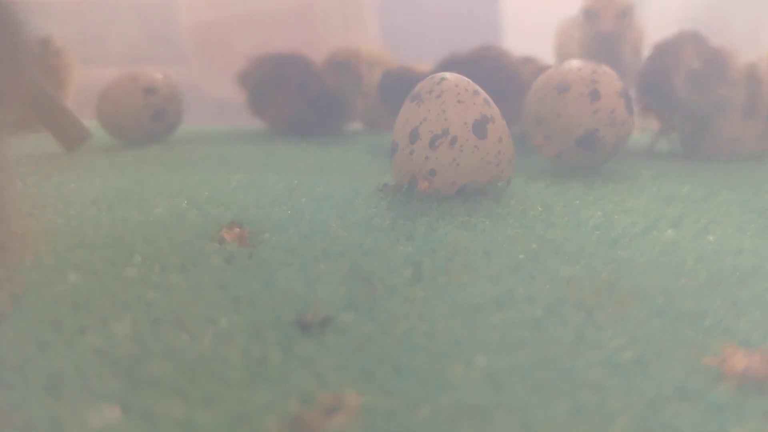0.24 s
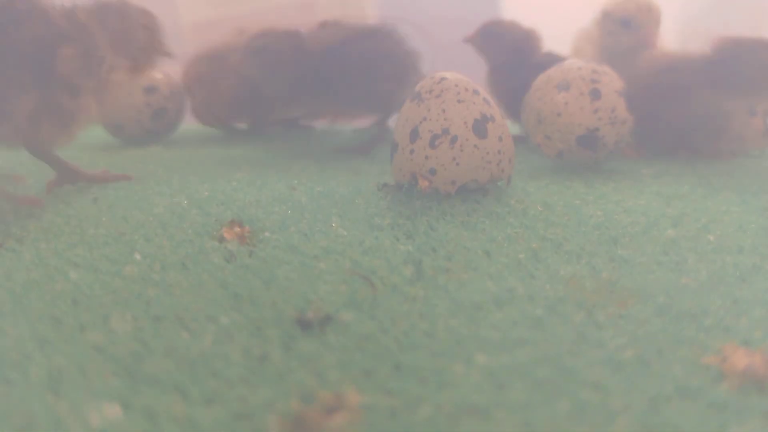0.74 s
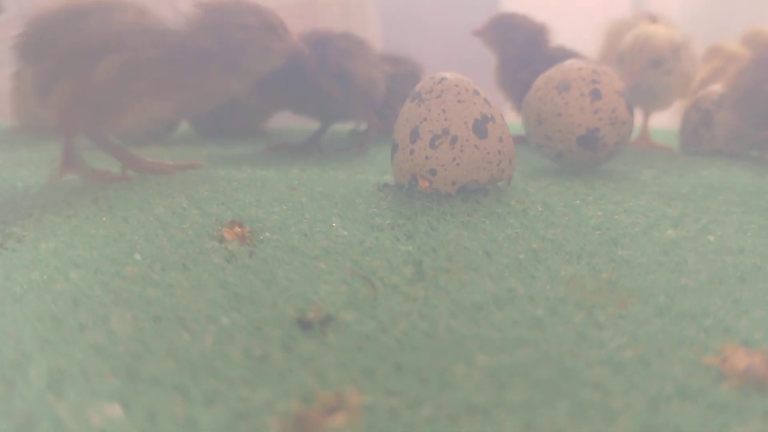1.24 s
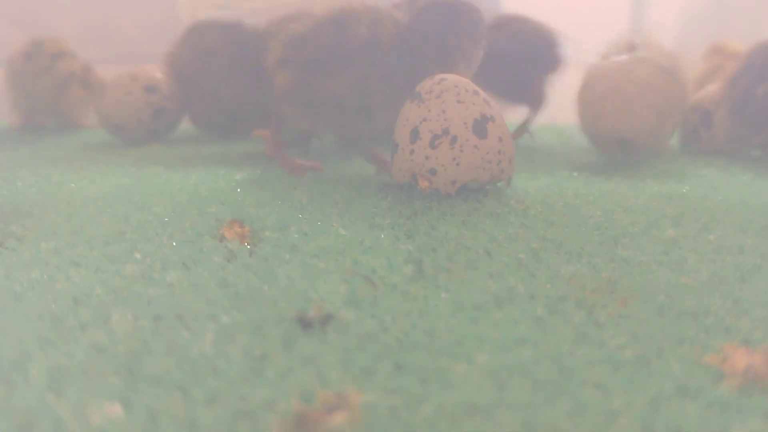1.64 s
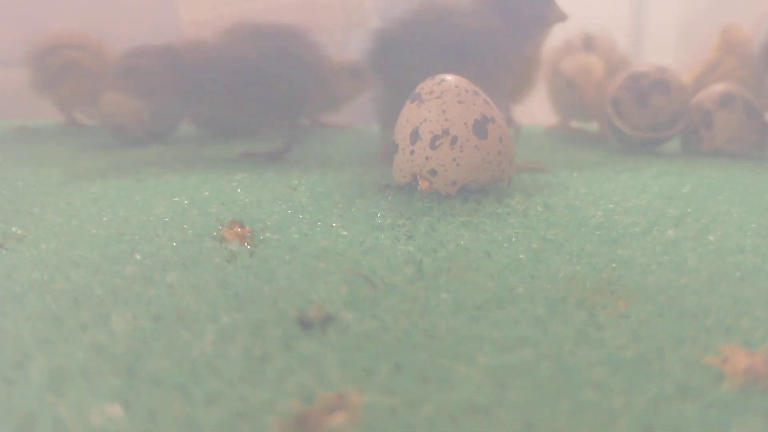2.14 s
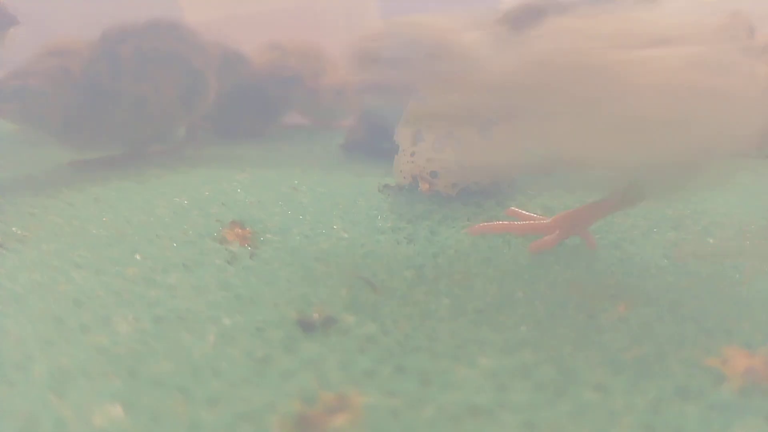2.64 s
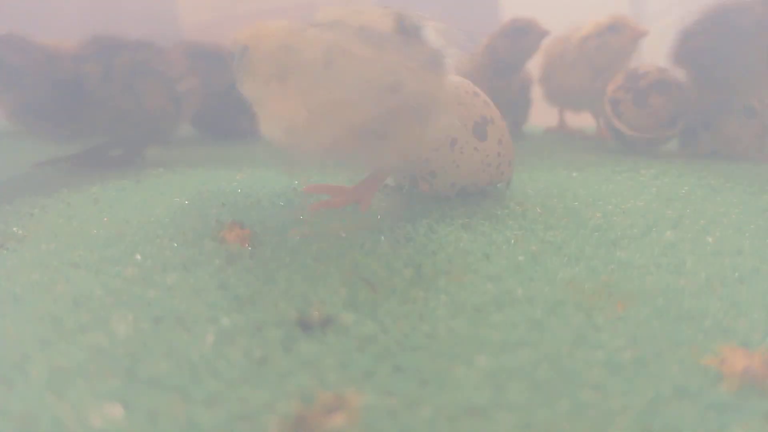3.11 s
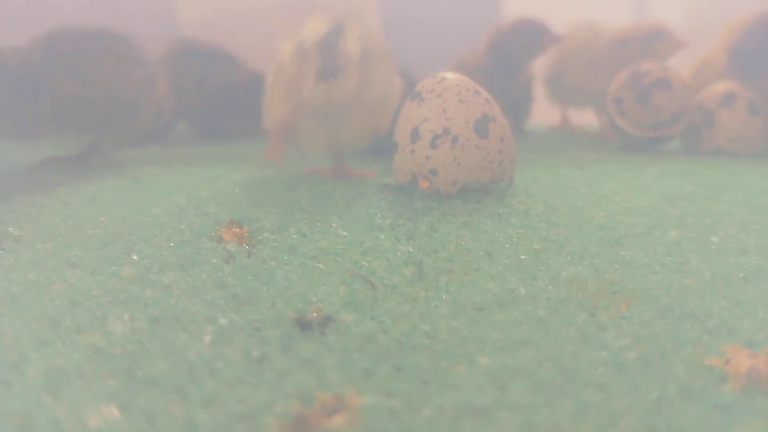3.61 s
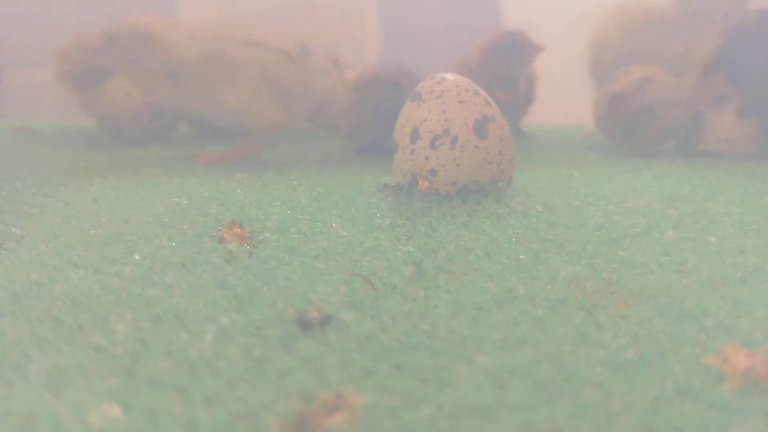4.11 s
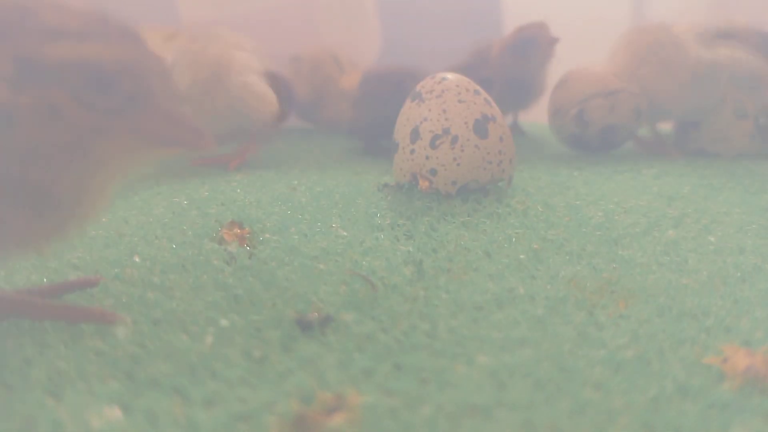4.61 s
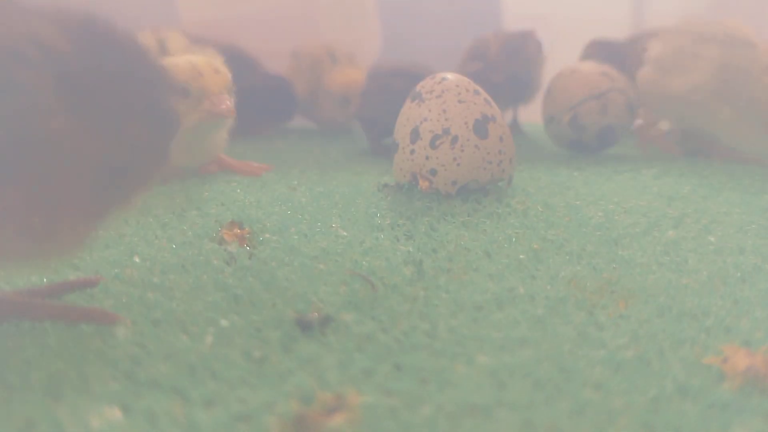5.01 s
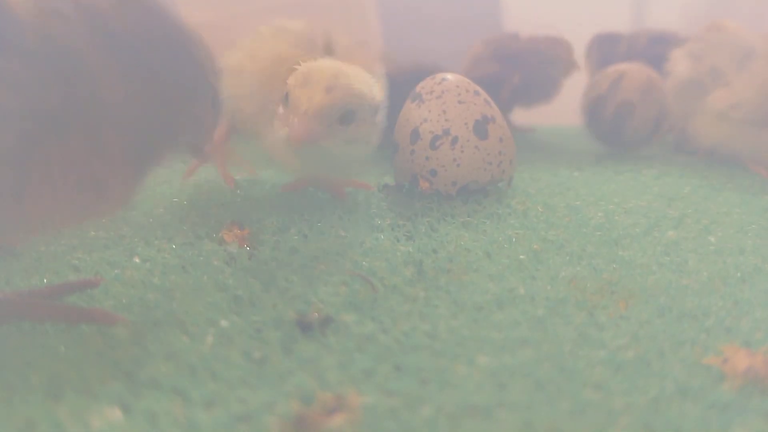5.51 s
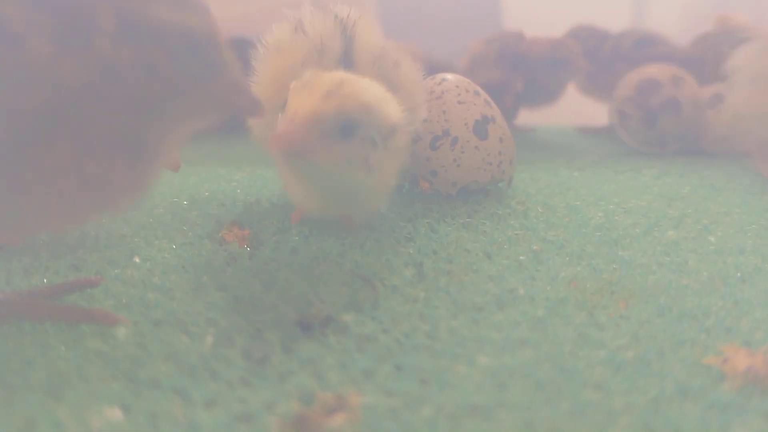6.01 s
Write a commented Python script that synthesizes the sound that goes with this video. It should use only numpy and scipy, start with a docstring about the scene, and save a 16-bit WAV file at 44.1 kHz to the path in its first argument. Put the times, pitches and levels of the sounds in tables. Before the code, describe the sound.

A microphone stands on the floor of a small plastic incubator among quail chicks. A faint, steady low drone and the distant patter and rustle of the flock last throughout. From 0.1 s feet thump the hollow floor; around 0.3-0.45 s a close scuffle mixes quick knocks, claw ticks, rasping down and a low nudge on the microphone. A strong hollow knock lands at 0.8 s, another softer one at 1.0. Scattered steps follow, and from 1.5 s soft short peeps near 3 kHz join. At 2.5-2.8 s a chick scrambles past: the sharpest cluster of clacks, thuds, scratches and brushing. A tiny hard tick snaps at 2.96 s, then faint down swishes by. From 3.3 to 6.3 s light, dull steps come irregularly, with quiet gliding peeps, some hoarse, clustered around 3.9-4.6, 4.9 and 5.9 s. Brief boxy echo.

```python
"""Quail chicks run about on a mat in a plastic incubator, the microphone standing on the floor among them.
From the start shaped noise makes the incubator's low drone, and random grains the patter and rustle of the flock.
At once feet and beaks thump the hollow floor and click, as damped modes and filtered noise; one chick scrambles
past and down brushes over the microphone, as stick-slip grains. From 1.5 s chicks peep softly, as gliding
harmonics; near 3 s a small hard thing ticks once, as high damped modes."""
import sys
import numpy as np
from scipy import signal
from scipy.fft import rfft, irfft
from scipy.io import wavfile
from scipy.ndimage import uniform_filter1d

SR = 44100
rng = np.random.default_rng(int(sys.argv[2]) if len(sys.argv) > 2 else 0)


def generate_wav(sig):
    """Save sig (samples, or channels by samples) to the path in sys.argv[1] as 16-bit PCM at SR."""
    pcm = np.round(np.clip(np.atleast_2d(sig).T, -1, 1) * 32767).astype(np.int16)
    wavfile.write(sys.argv[1], SR, pcm)


N = 275692
AGE = np.arange(SR // 3) / SR  # seconds since a blow

# All spectra below give relative gain. Each row: frequency in Hz, gain in dB.
# The incubator's drone, and its overall level in dB.
DRONE_SPECTRUM = [(15, -52), (25, 6.5), (53, -3), (97, 7.5), (270, 2), (476, -17), (796, -13.5),
                  (1610, -28), (2760, -23), (5880, -36.5), (7110, -42.5), (8590, -34), (11900, -45.5),
                  (14800, -85), (16000, -90)]
DRONE_DB = -61
# How the patter of the flock comes and goes. Each row: time in seconds, level in dB before the trims in flock().
PATTER_CURVE = [(0, -62.5), (.3, -53.5), (.55, -60.5), (.85, -58.5), (1.08, -61.5), (1.3, -65),
                (1.55, -65.5), (1.85, -62.5), (2.4, -74), (2.51, -74), (2.56, -63), (2.7, -54),
                (2.95, -70.5), (3.55, -62), (3.75, -68), (4.1, -71), (4.45, -61.5), (4.75, -72.5),
                (5.4, -69), (6.1, -70.5), (6.25, -60.5)]
# How the rustle of down comes and goes. Each row: time in seconds, level in dB before the trim in flock().
DOWN_CURVE = [(0, -74.5), (.3, -74.5), (.55, -82), (.8, -81), (.92, -71.5), (1.08, -90.5), (1.25, -82),
              (1.55, -82.5), (1.72, -75.5), (1.88, -77.5), (2.08, -78.5), (2.2, -84), (2.4, -86),
              (2.7, -85), (3, -87), (3.3, -80.5), (3.53, -77.5), (3.7, -86), (4.1, -89), (4.42, -81),
              (4.7, -86), (5.4, -86), (5.8, -85), (6.1, -79), (6.25, -82)]
# Central pitches of the spots where the far steps land. Each entry: frequency in Hz.
SCUFF_HZ = [327, 520, 701, 797, 1050, 1347]
# Spectra of the far patter and of rustling down.
PATTER_SPECTRUM = [(200, 1), (400, 6), (900, 4.5), (1400, -3.5), (2000, -8), (2800, -11), (4500, -18),
                   (7000, -23), (16000, -52)]
RUSTLE_SPECTRUM = [(2500, 2.5), (4000, -9), (6000, -10.5), (7500, -4.5), (8900, 1.5), (10300, -10),
                   (12500, -14), (16000, -18)]

# Down and toes rubbing along. Each row: start in seconds, length in seconds, then rumble, rasp and hiss in dB.
RUBS = [(0.062, 0.053, -44, -58, -58.5), (0.1, 0.11, -64, -55.5, -86), (0.276, 0.1, -46.5, -41.5, -61.5),
        (0.349, 0.046, -39, -43, -68), (0.367, 0.16, -49.5, -51.5, -61.5),
        (0.577, 0.15, -54.5, -61.5, -67.5), (0.754, 0.07, -58, -47.5, -48.5), (1.903, 0.081, -56, -70, -77),
        (2.021, 0.025, -51, -65, -85), (2.544, 0.08, -51, -50.5, -75), (2.66, 0.15, -65, -58, -66),
        (2.732, 0.076, -43.5, -48, -70), (2.772, 0.059, -75, -61, -51.5)]
# Spectra of the rasp and the hiss of rubbing.
RASP_SPECTRUM = [(250, 4.5), (500, 14), (900, 9.5), (1500, 2.5), (1900, -7), (2170, 0.5), (2600, -7.5),
                 (4500, -14), (7000, -18), (12000, -53)]
HISS_SPECTRUM = [(1500, 9.5), (3000, 4.5), (5500, -6), (7300, 6), (8900, 12), (10300, -2), (13000, -8),
                 (16000, -15)]

# Footfalls and pecks. Each row: start in seconds, floor thud in dB, panel knock in dB, claw tick in dB,
# knock pitch in Hz.
TAPS = [(0.082, -46, -51, -78, 750), (0.138, -58, -55, -67, 750), (0.211, -83, -64, -54.5, 940),
        (0.301, -72, -60, -51.5, 1050), (0.3532, -36.5, -40.5, -50, 684), (0.367, -40, -44, -71, 770),
        (0.377, -41, -39.5, -60, 1160), (0.4082, -53.5, -77, -58.5, 1100), (0.412, -48, -54, -51.5, 800),
        (0.4234, -57, -47, -53, 870), (0.44, -68, -62, -59, 910), (0.483, -58, -62, -65, 1000),
        (0.558, -51.5, -66, -87, 780), (0.596, -78, -68, -62.5, 1000), (0.641, -63, -48, -68, 1390),
        (0.664, -58, -56, -68, 1440), (0.731, -44, -54.5, -90, 514), (0.8193, -30, -31.5, -44.5, 1040),
        (0.8424, -51, -46, -66, 1400), (0.963, -48.5, -77, -77, 650), (1.0088, -44, -43.5, -83, 810),
        (1.124, -44, -60.5, -93, 780), (1.3106, -53, -48.5, -53.5, 1310), (1.4714, -57, -54, -60, 1070),
        (1.5989, -50.5, -48.5, -61.5, 890), (1.6635, -47.5, -47.5, -58, 810),
        (1.752, -54.5, -57.5, -68, 810), (1.8417, -43.5, -49, -49, 720), (1.8501, -52, -59, -58.5, 900),
        (2.022, -54, -60, -81, 1060), (2.1028, -50.5, -56, -52, 1360), (2.1572, -62, -65, -66, 1000),
        (2.196, -58, -63.5, -90, 850), (2.2966, -56.5, -59.5, -67, 820), (2.3312, -41.5, -48.5, -60.5, 907),
        (2.349, -45, -58, -90, 900), (2.3835, -48.5, -50, -55, 795), (2.5209, -40.5, -31, -32, 1600),
        (2.5295, -38, -32.5, -46, 1250), (2.5344, -35.5, -31.5, -35, 1660), (2.5364, -36, -34, -28.5, 1520),
        (2.5854, -54, -47.5, -50, 1300), (2.6319, -35, -29, -41.5, 950), (2.668, -42, -49, -65, 880),
        (2.676, -46, -45, -62, 910), (2.6928, -68, -47, -47, 1195), (2.7277, -50, -38, -34.5, 2030),
        (2.7769, -53.5, -45.5, -47.5, 1400), (2.797, -70, -56, -62, 2500), (2.8063, -63, -53, -53, 2400),
        (2.8209, -71, -70, -59, 2200), (2.875, -49, -50, -51, 900), (3.033, -56, -89, -88, 795),
        (3.0458, -46.5, -59, -60.5, 750), (3.181, -55.5, -70, -75, 700), (3.2961, -44, -57.5, -57.5, 830),
        (3.3186, -74, -56.5, -58.5, 1090), (3.392, -52.5, -76, -72, 850),
        (3.4112, -54.5, -56.5, -62.5, 1010), (3.572, -41.5, -47.5, -50.5, 1190),
        (3.589, -43, -54, -84, 760), (3.8024, -59, -68, -73, 1020), (3.846, -61, -67, -72, 1050),
        (3.931, -61.5, -67, -85.5, 1050), (3.967, -65, -63.5, -91.5, 750), (4.067, -65, -61.5, -66, 830),
        (4.234, -48.5, -55, -58.5, 1170), (4.258, -63, -68, -67, 1100), (4.2743, -56, -66, -69, 1000),
        (4.343, -54, -64, -80, 1050), (4.366, -50.5, -54, -60, 1020), (4.4332, -50.5, -54.5, -64, 830),
        (4.534, -51.5, -57.5, -64, 876), (4.5618, -50.5, -53.5, -58, 1490), (4.674, -58, -67, -88, 940),
        (4.778, -58.5, -66, -92, 855), (4.7991, -62, -52.5, -60.5, 1000), (4.8484, -61, -69, -67.5, 1100),
        (4.863, -62, -61.5, -65, 940), (5.019, -64, -64, -95, 710), (5.071, -67, -60.5, -73, 870),
        (5.1285, -54, -64, -66.5, 1100), (5.2402, -56, -64, -88, 780), (5.6572, -46, -56, -59.5, 1110),
        (5.7579, -59.5, -70, -66.5, 826), (5.842, -53, -63, -97, 780), (5.89, -56.5, -61, -78, 920),
        (5.93, -54.5, -56, -90, 783), (6.0173, -66, -73, -70.5, 1000), (6.064, -56, -64, -82, 700),
        (6.1347, -80, -80, -66, 1000), (6.181, -70, -68, -88, 890), (6.236, -52.5, -64, -80, 760)]
# Modes of the hollow floor. Each row: frequency in Hz, strength in dB, 60 dB decay time in seconds.
FLOOR_MODES = [(116.3, -17, 0.53), (153.3, -4.5, 0.12), (183.6, -9, 0.22), (230.7, 9.5, 0.027),
               (255, 3, 0.03), (285, -1, 0.11), (352.6, -6.5, 0.14), (420.3, -12.5, 0.17),
               (492, -11.5, 0.03)]
# Modes of the plastic panels. Each row: frequency in Hz, strength in dB, 60 dB decay time in seconds.
PANEL_MODES = [(510.3, -6.5, 0.16), (621.4, 11.5, 0.085), (726, 0.5, 0.052), (872, 2, 0.077),
               (1004, -4.5, 0.26), (1086, 2.5, 0.13), (1335, -2.5, 0.15), (1460, -15, 0.061),
               (1610, -9, 0.069), (1796, 2.5, 0.057), (1854, 10, 0.055), (2470, 1.5, 0.052),
               (2705, -7, .07), (3350, 2, .06), (3550, 4.5, .06)]
# Spectra of a claw on plastic, of its crisp top, and of the brief echo of a click inside the box.
TICK_SPECTRUM = [(1000, -2.5), (1850, 1.5), (2170, -3), (2500, 1), (3400, -2), (4200, -11), (5100, -11),
                 (5700, -14), (8000, -32.5), (16000, -31.5)]
SNAP_SPECTRUM = [(3000, -47), (5100, -15.5), (5600, -4.5), (6300, -6), (7000, -2), (7800, -0.5),
                 (8900, 1.5), (9900, -8.5), (10700, -10.5), (13000, -21), (16000, -28.5)]
BOX_ECHO_SPECTRUM = [(1000, 6.5), (1850, 10.5), (2170, -2.5), (2500, 0), (3400, 1), (4500, -3.5),
                     (5200, -5.5), (6000, -12), (8800, -2), (10500, -10.5), (13000, -42), (16000, -39)]
# Spectrum of the waves thrown back from the floor's rim.
RIM_SPECTRUM = [(80, -32.0), (150, 0.0), (240, 7.5), (370, -4.5), (470, -15.5), (900, -15.0),
                (3000, -79.0), (10000, -104.0)]
# Spectrum of the contact noise that drives a knock.
CRACK_SPECTRUM = [(250, -24.5), (480, 3.0), (1200, 4.0), (1850, 1.5), (2170, 3), (2500, 6.5),
                  (3500, -15.5), (5000, -19.5)]
THUD_S, KNOCK_S, TICK_S = .035, .014, .005  # span in seconds over which each part's level is set
KNOCK_Q = 1.4  # sharpness of the resonance where the foot lands
# Crisp top: dB relative to the tick, and further dB per dB of tick over knock.
SNAP_DB, SNAP_SLOPE = -6, 0.5
# Second contact of the settling foot: median delay in seconds, its log scatter, dB, and low-pass cutoff in Hz.
SETTLE_S, SETTLE_SCATTER, SETTLE_DB, SETTLE_HZ = 0.015, 0.1493, -12, 1175
# The floor's bending wave: median start and end pitch, glide time constant, 60 dB decay time, level.
BEND_FROM_HZ, BEND_TO_HZ, BEND_S, BEND_T60_S, BEND_DB = 628.7, 197, 0.0044, 0.07, -7.5
FLOOR_LOW_HZ = 84  # the small floor radiates little below this

# Down or toes sweeping over the mat. Each row: start in seconds, length in seconds, centre in Hz, level in dB.
SWISHES = [(0.136, 0.058, 4080, -65.5), (0.118, 0.13, 674, -58.5), (0.625, 0.051, 1720, -59),
           (2.009, 0.052, 8550, -66), (2.731, 0.015, 2600, -44), (3.076, 0.38, 4270, -77),
           (3.09, 0.23, 6000, -79)]
# Claws scratching over plastic. Each row: start in seconds, length in seconds, level in dB.
SCRATCHES = [(0.311, 0.028, -60), (0.414, .016, -55.5), (2.544, .03, -53), (2.669, 0.013, -58),
             (2.69, .025, -58), (2.733, .03, -58), (2.774, 0.01, -49), (2.795, 0.01, -48.5),
             (2.924, .005, -67), (5.882, 0.053, -81)]
# Modes of a scratching claw. Each row: frequency in Hz, strength in dB, 60 dB decay time in seconds.
CLAW_MODES = [(1770, 2, 0.018), (2490, 2, .016), (3070, -5, 0.012), (3580, -5, .012), (4220, 0, .012),
              (4540, 0, 0.017), (5450, -3, .012), (6200, -4, 0.011), (7000, -2, .012), (7700, -4, 0.0064)]
# A body nudging the microphone. Each row: start in seconds, length in seconds, level in dB.
NUDGES = [(0.331, 0.16, -47), (2.001, 0.19, -64.5), (2.558, 0.06, -55), (3.018, 0.095, -53.5)]
# Spectrum of a nudge.
NUDGE_SPECTRUM = [(20, 19.5), (60, 29.5), (100, 30.5), (170, 14), (300, -25), (2000, -78)]

# Peeps. Each row: start in seconds, length in seconds, opening, middle and closing pitch in Hz, level in dB,
# octave in dB relative to the fundamental, hoarseness from 0 to 1.
PEEPS = [(1.527, 0.062, 2900, 3035, 3070, -61, -40, 0), (1.602, 0.047, 2400, 2580, 2550, -64.5, -2, 0),
         (1.671, .058, 2770, 2840, 2870, -64.5, -11, 0.14),
         (1.726, 0.045, 2850, 2850, 2800, -69, -25, 0.14),
         (1.803, 0.038, 3680, 3980, 3530, -70.5, -25, 0.1), (2.037, 0.038, 2450, 2600, 2520, -71, -30, .2),
         (2.403, 0.068, 2950, 3130, 2650, -74, -18, .15), (3.068, .035, 2700, 3020, 3080, -72, -27, .15),
         (3.101, .07, 3080, 3110, 3020, -73, -29, .15), (3.285, .08, 2900, 2896, 2900, -72, -29, 0.34),
         (3.907, 0.045, 2700, 3050, 3050, -74, -30, 0.3), (3.939, 0.063, 3020, 2987, 2980, -69, -24, 0.2),
         (3.94, .04, 3250, 3320, 3320, -72, -27, .25), (4.083, .058, 3430, 3590, 3380, -74, -28, 0.32),
         (4.191, 0.011, 2600, 2670, 2650, -60, -29, .7), (4.197, 0.11, 2800, 2680, 2780, -69, -31, 0.9),
         (4.203, 0.061, 2360, 2420, 2430, -74, -4, 0.1), (4.324, 0.087, 2630, 2680, 2700, -69.5, -24, 0.76),
         (4.43, .075, 2750, 3240, 3130, -72, -24, 0.3), (4.45, 0.06, 2480, 2650, 2690, -69.5, -20, .45),
         (4.563, 0.037, 2660, 2630, 2570, -65, -22, 0.4), (4.608, .075, 2500, 2570, 2750, -81, -24, 0.55),
         (4.585, .065, 3970, 3900, 3880, -76, -29, 0.2), (4.944, 0.049, 2260, 2495, 2510, -67, -11, .15),
         (4.983, .05, 2500, 2520, 2480, -73, -7, 0), (4.938, 0.15, 2910, 2790, 2660, -75, -25.5, 0.15),
         (5.204, 0.067, 2760, 3040, 3190, -67.5, -22, .15), (5.625, .045, 2950, 3050, 2980, -80, -22, .2),
         (5.859, 0.042, 2680, 3140, 3200, -66.5, -30, .2), (5.895, .05, 3320, 3350, 3290, -72, -32, .3),
         (5.92, .06, 2850, 2650, 2560, -75, -32, .5), (6.013, 0.073, 3350, 3740, 3690, -75.5, -32, .2),
         (6.187, .09, 2650, 2770, 2730, -70, -23, 0.1)]
HOARSE_HZ = 518.6  # how fast a hoarse voice fluctuates

# The small hard tick. Each row: start in seconds, level in dB of the ring and snap combined.
PINGS = [(2.959, -38.5)]
# Modes of the hard tick. Each row: frequency in Hz, strength in dB, 60 dB decay time in seconds.
PING_MODES = [(2310, 2.5, 0.013), (3530, 3, 0.013), (3700, -1, 0.043), (5130, -1, 0.0093),
              (6600, 0.5, 0.0075), (8230, -2, 0.017), (8830, -2, 0.036), (10400, -4, .01),
              (13000, -3, 0.013), (14100, 5, 0.0082), (15550, -1, 0.022)]
# Spectra of the hard tick's snap and of its echo in the box.
PING_SNAP_SPECTRUM = [(200, 12), (1500, -11), (2300, 1.0), (4500, -4.0), (7400, -14), (9000, 8.0),
                      (11500, -25), (13200, -11), (16000, -7)]
PING_ECHO_SPECTRUM = [(1500, -14), (2300, 3), (4500, -2), (7400, -9), (9000, 6), (11500, -25), (16000, -22)]

TOP_HZ = 16200  # the recorder's upper limit


def undb(db):
    """Level law: decibels to amplitude gain."""
    return 10 ** (np.asarray(db) / 20)


def unit(x, span=None):
    """Normalization to rms 1, over the first span seconds if given."""
    head = x if span is None else x[:int(span * SR)]
    return x / np.sqrt(np.mean(head ** 2) + 1e-18)


def add(out, s, x):
    """Superposition: mix x into out at s seconds."""
    i = max(int(s * SR), 0)
    out[i:i + len(x)] += x[:max(len(out) - i, 0)]


def colour(x, points):
    """Minimum-phase filtering: a causal response with a spectrum of (Hz, dB) points."""
    hz, db = np.transpose(points)
    size = 2048
    grid = np.maximum(np.arange(size // 2 + 1) * SR / size, 1)
    gain = undb(np.interp(np.log(grid), np.log(hz), db))
    # folding the cepstrum onto positive times makes the response causal
    cepstrum = irfft(np.log(gain))
    cepstrum[1:size // 2] *= 2
    cepstrum[size // 2 + 1:] = 0
    response = irfft(np.exp(rfft(cepstrum)))
    return signal.fftconvolve(x, response)[:len(x)]


def fade(t60):
    """Linear damping: exponential decay by 60 dB in t60 seconds."""
    return np.exp(-np.log(1000) * AGE / t60)


def ring(modes, scatter_db, detune, spread=0):
    """Modal superposition: damped modes whose strengths and phases depend on where the blow lands."""
    out = np.zeros(len(AGE))
    for hz, db, t60 in modes:
        level, pitch, phase = rng.standard_normal(3)
        angle = 2 * np.pi * hz * (1 + detune * pitch) * AGE + spread * phase
        out += undb(db + scatter_db * level) * fade(t60) * np.sin(angle)
    return out


def walk(rate):
    """Band-limited fluctuation: a random wander of rms 1, with rate new values per second."""
    k = int(SR / rate)
    steps = np.repeat(rng.standard_normal(N // k + 1), k)
    return unit(uniform_filter1d(steps, k)[:N])


def grains(rate, scatter_db):
    """Stick-slip friction: random tiny slips of uneven size, about rate per second."""
    happens = rng.random(N) < rate / SR
    size = undb(scatter_db * np.minimum(rng.exponential(size=N), 4))
    return happens * rng.choice([-1, 1], N) * size


def swell(length, edge=0.38):
    """Amplitude envelope: a rounded rise and fall, each taking the fraction edge of the length."""
    return signal.windows.tukey(int(length * SR), 2 * edge)


def drone():
    """Stationary noise: the incubator's low hum of shaped noise, wandering about 1 dB in level."""
    return undb(DRONE_DB + walk(2.9)) * unit(colour(rng.standard_normal(N), DRONE_SPECTRUM))


def flock(scuff_db=-1, tread_db=-1.5, rustle_db=5.5):
    """Random impacts: many light steps further back knock at the pitch of their spots, and down rustles."""
    time = np.arange(N) / SR
    patter = undb(np.interp(time, *np.transpose(PATTER_CURVE)))
    rustle = undb(np.interp(time, *np.transpose(DOWN_CURVE)))
    steps, spots = np.zeros(N), np.zeros(N)
    for hz in SCUFF_HZ:
        group = grains(rate=13, scatter_db=2.5)
        steps += group
        spot = ring([(hz, 0, 0.031)], scatter_db=-1.0, detune=0.036)
        spots += signal.fftconvolve(group, spot)[:N]
    floor = ring(FLOOR_MODES, scatter_db=7.0, detune=0.02, spread=2.8)
    tread = unit(signal.fftconvolve(steps, floor)[:N])
    brush = rng.standard_normal(len(AGE)) * fade(0.15)
    scrapes = colour(signal.fftconvolve(steps, brush)[:N], PATTER_SPECTRUM)
    scuffs = unit(unit(scrapes) + undb(2) * unit(colour(spots, PATTER_SPECTRUM)))
    down = unit(colour(grains(rate=4500, scatter_db=3.0), RUSTLE_SPECTRUM)) * undb(2 * walk(36))
    near_floor = undb(scuff_db) * scuffs + undb(tread_db) * tread
    return patter * near_floor + undb(rustle_db) * rustle * down


def rubbing():
    """Friction-driven vibration: slips in uneven spurts shake the floor, rasp the panels and hiss in the down."""
    spurts = undb(3.5 * walk(130))
    slips = grains(rate=1600, scatter_db=-3.0) * spurts
    floor = ring(FLOOR_MODES, scatter_db=-5.0, detune=0.011, spread=0.75)
    rumble = unit(signal.fftconvolve(slips, floor)[:N])
    panel_ring = ring(PANEL_MODES, scatter_db=-4.5, detune=0.0062, spread=1.8)
    panels = signal.fftconvolve(slips, panel_ring)[:N]
    rasp = unit(colour(unit(slips) + undb(-15) * unit(panels), RASP_SPECTRUM))
    hiss = unit(colour(grains(rate=2400, scatter_db=2.5) * spurts, HISS_SPECTRUM))
    out = np.zeros(N)
    for s, length, rumble_db, rasp_db, hiss_db in RUBS:
        press = np.zeros(N)
        add(press, s, swell(length, edge=0.5))
        out += press * (undb(rumble_db) * rumble + undb(rasp_db) * rasp + undb(hiss_db) * hiss)
    return out


def bending():
    """Dispersion: a falling chirp, since in a thin plate the high waves outrun the low ones."""
    hz = BEND_TO_HZ + (BEND_FROM_HZ - BEND_TO_HZ) * np.exp(-AGE / BEND_S)
    hz = hz * np.exp(.12 * rng.standard_normal())  # each blow has its own pitch
    return unit(np.sin(2 * np.pi * np.cumsum(hz) / SR) * fade(BEND_T60_S), THUD_S)


def floor_thud():
    """Plate vibration: floor modes, rim reflections and bending waves build up over a few milliseconds."""
    modes = ring(FLOOR_MODES, scatter_db=1.5, detune=0.018, spread=1.09)
    # waves thrown back from the rim keep the floor moving for a moment
    returns = colour(rng.standard_normal(len(AGE)) * np.exp(-(AGE / 0.03) ** 2), RIM_SPECTRUM)
    floor = unit(modes, THUD_S) + undb(-5.0) * unit(returns, THUD_S)
    onset = 1 - np.exp(-(AGE / 0.0035) ** 2)
    return unit((floor + undb(BEND_DB) * bending()) * onset, THUD_S)


def panel_knock(knock_hz):
    """Local resonance: contact noise and panel modes pass through a resonant low-pass at the spot's pitch."""
    decay = fade(0.026) + undb(-25.5) * fade(0.3)
    crack = colour(rng.standard_normal(len(AGE)) * decay, CRACK_SPECTRUM)
    panels = ring(PANEL_MODES, scatter_db=5.0, detune=0.0058, spread=3.0)
    drive = unit(crack, KNOCK_S) + undb(-8.0) * unit(panels, KNOCK_S)
    w = 2 * np.pi * knock_hz
    spot = signal.bilinear([w * w], [1, w / KNOCK_Q, w * w], SR)
    return unit(signal.lfilter(*spot, drive), KNOCK_S)


def claw_contact():
    """Impulsive contact: a sharp point and short noise give the tick with its box echo, and its crisp top."""
    noise = rng.standard_normal((3, len(AGE)))
    # one claw strikes sharply and the other toes land within a few milliseconds
    toes = (1 - np.exp(-AGE / 0.00044)) * fade(0.012)
    toes = toes + undb(-21.5) * np.roll(toes, int(rng.uniform(0.001, 0.0054) * SR))
    point = unit(signal.unit_impulse(len(AGE), int(.0006 * SR)), TICK_S)
    direct = unit(colour(unit(noise[0] * toes, TICK_S) + point, TICK_SPECTRUM), TICK_S)
    echo = unit(colour(noise[1] * fade(0.42), BOX_ECHO_SPECTRUM), TICK_S)
    tick = direct + undb(-18) * echo
    crisp = unit(noise[2] * (toes + undb(-21.0) * fade(0.099)), TICK_S)
    snap = unit(colour(crisp + point, SNAP_SPECTRUM), TICK_S)
    return tick, snap


def footfall(thud_db, knock_db, tick_db, knock_hz):
    """Successive impact: a foot lands, then settles a moment later with a weaker, duller contact."""
    tick, snap = claw_contact()
    # a light, sharp contact has more crisp top
    snap_db = tick_db + SNAP_DB + SNAP_SLOPE * (tick_db - knock_db)
    step = undb(thud_db) * floor_thud() + undb(knock_db) * panel_knock(knock_hz)
    step += undb(tick_db) * tick + undb(snap_db) * snap
    soft = signal.lfilter(*signal.butter(2, SETTLE_HZ, fs=SR), step)
    delay = SETTLE_S * np.exp(SETTLE_SCATTER * rng.standard_normal())
    add(step, delay, undb(SETTLE_DB) * soft)
    return step


def feet():
    """Superposed impacts: all footfalls and pecks."""
    out = np.zeros(N)
    for s, *blow in TAPS:
        add(out, s, footfall(*blow))
    return out


def radiate(blows):
    """Radiation efficiency: a small floor is a weak source of low frequencies."""
    return signal.sosfilt(signal.butter(2, FLOOR_LOW_HZ, "high", fs=SR, output="sos"), blows)


def swishes(width=0.11):
    """Sliding friction: bands of stick-slip grains from sweeping down and toes."""
    out, slips = np.zeros(N), grains(rate=830, scatter_db=-2.0)
    for s, length, hz, db in SWISHES:
        band = signal.butter(2, [hz / (1 + width), hz * (1 + width)], "band", fs=SR)
        scrape = signal.lfilter(*band, slips[int(s * SR):][:int(length * SR)])
        add(out, s, undb(db) * swell(length) * unit(scrape))
    return out


def scratches():
    """Stick-slip excitation of modes: a claw catches and slips, each scratch ringing a little differently."""
    out, slips = np.zeros(N), grains(rate=900, scatter_db=5.0)
    for s, length, db in SCRATCHES:
        catches = slips[int(s * SR):][:int(length * SR)].copy()
        catches[0] += 1  # the first catch
        claw = ring(CLAW_MODES, scatter_db=3, detune=.02, spread=2.5)
        add(out, s, undb(db) * unit(signal.fftconvolve(catches, claw), length))
    return out


def nudges():
    """Direct contact: a body pressing on the microphone gives bursts of low noise."""
    out = np.zeros(N)
    for s, length, db in NUDGES:
        sway = colour(rng.standard_normal(int(length * SR)), NUDGE_SPECTRUM)
        add(out, s, undb(db) * unit(sway) * swell(length, edge=0.15))
    return out


def peeps(echo_db=-9, flutter_db=1.5, third_db=-7):
    """Harmonic voice: soft gliding whistles, uneven and some hoarse, echoing briefly in the box."""
    out, flutter, wobble = np.zeros(N), undb(flutter_db * walk(90)), walk(170)
    rasp = (walk(HOARSE_HZ) + 1j * walk(HOARSE_HZ)) / np.sqrt(2)
    for s, length, open_hz, middle_hz, close_hz, db, octave_db, hoarse in PEEPS:
        shape = swell(length, edge=0.24)
        along = np.linspace(0, 1, len(shape))
        during = (int(s * SR) + np.arange(len(shape))) % N
        # a parabola through the three pitches
        hz = np.polyval(np.polyfit([0, .5, 1], [open_hz, middle_hz, close_hz], 2), along)
        phase = 2 * np.pi * np.cumsum(hz * (1 + .035 * hoarse * wobble[during])) / SR
        voice = np.exp(1j * phase) + undb(octave_db) * np.exp(2j * phase)
        voice += undb(2 * octave_db + third_db) * np.exp(3j * phase)
        # hoarseness trades steady tone for random modulation
        throat = np.sqrt(1 - hoarse ** 2) + hoarse * rasp[during]
        add(out, s, undb(db) * shape * flutter[during] * (voice * throat).imag)
    box = rng.standard_normal(len(AGE)) * fade(0.17)
    echo = signal.fftconvolve(out, box / np.linalg.norm(box))[:N]
    return out + undb(echo_db) * echo


def hard_tick():
    """Modal ringing of a small hard body: high, quickly damped modes with a noise snap and a box echo."""
    out = np.zeros(N)
    for s, db in PINGS:
        snap = colour(rng.standard_normal(len(AGE)) * fade(0.019), PING_SNAP_SPECTRUM)
        echo = colour(rng.standard_normal(len(AGE)) * fade(0.2), PING_ECHO_SPECTRUM)
        tone = ring(PING_MODES, scatter_db=0, detune=0.0022, spread=2.5)
        ping = unit(tone, 0.0051) + unit(snap, 0.003) + undb(-19) * unit(echo, TICK_S)
        add(out, s, undb(db) * ping / np.sqrt(2))
    return out


def scene():
    """Superposition of all sources at one microphone."""
    blows = radiate(feet() + hard_tick())
    friction = rubbing() + swishes() + scratches()
    return (drone() + flock() + blows + friction + nudges() + peeps())[None]


def record(dry):
    """Band limiting: the recorder cuts the top."""
    return signal.sosfilt(signal.ellip(8, .2, 70, TOP_HZ, fs=SR, output="sos"), dry)


dry = scene()
out = record(dry)
generate_wav(out)
```